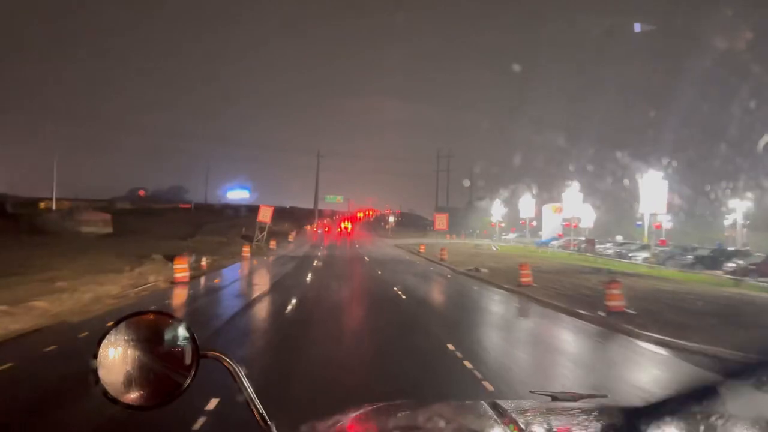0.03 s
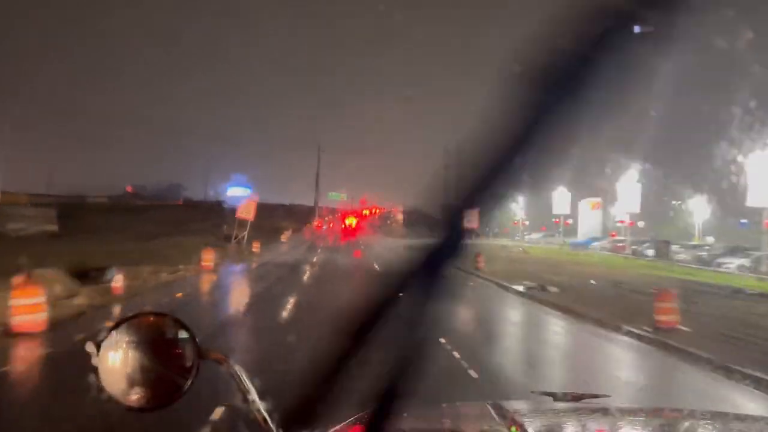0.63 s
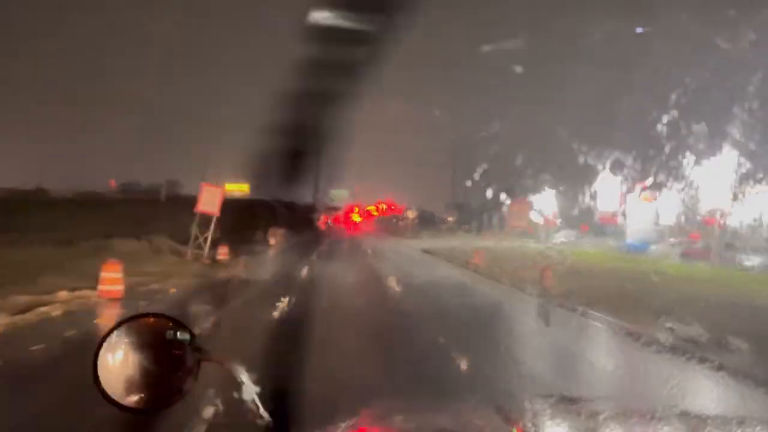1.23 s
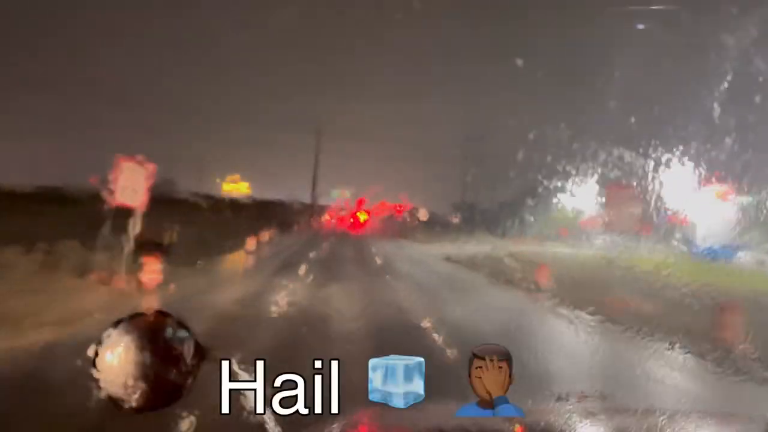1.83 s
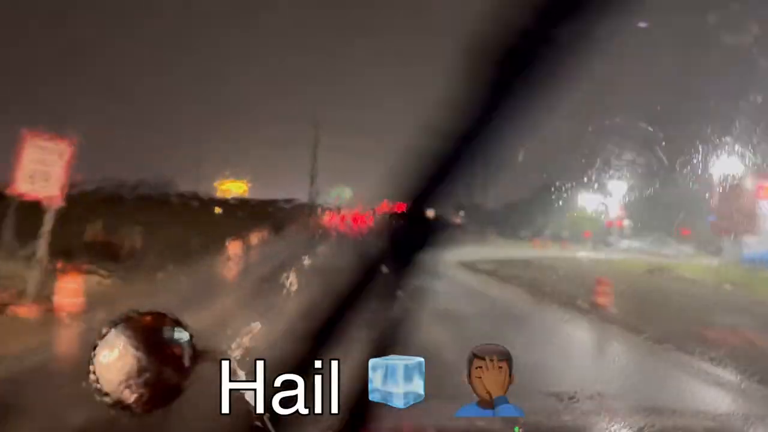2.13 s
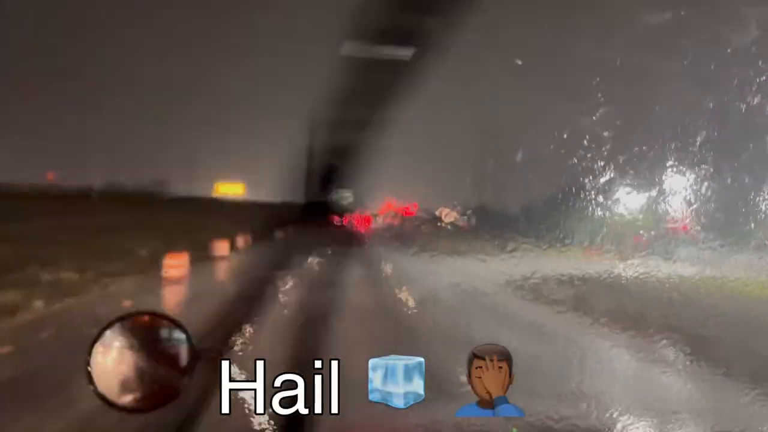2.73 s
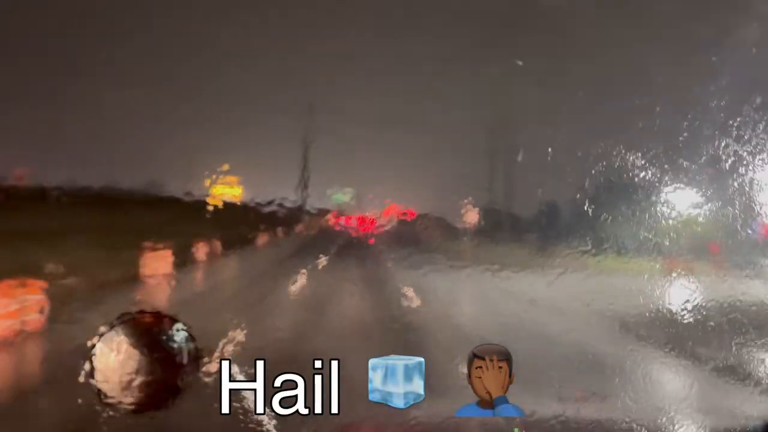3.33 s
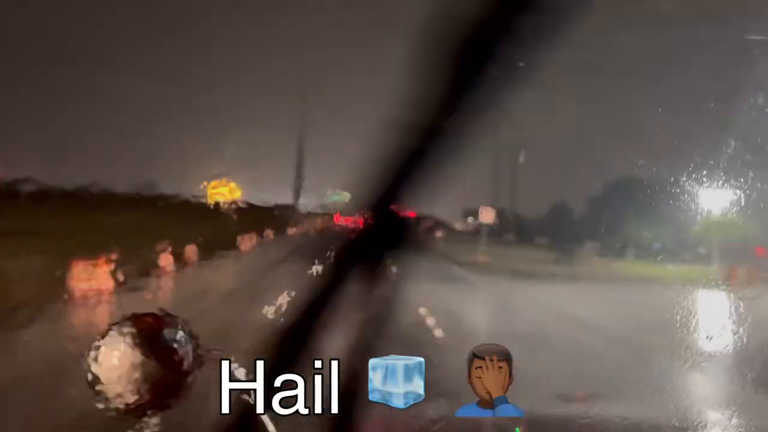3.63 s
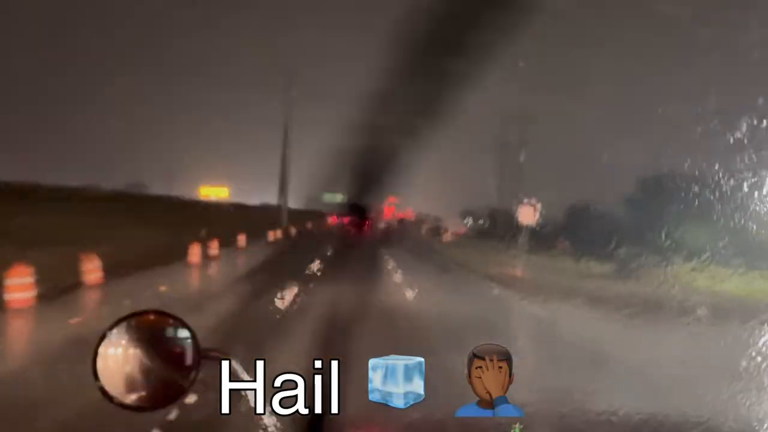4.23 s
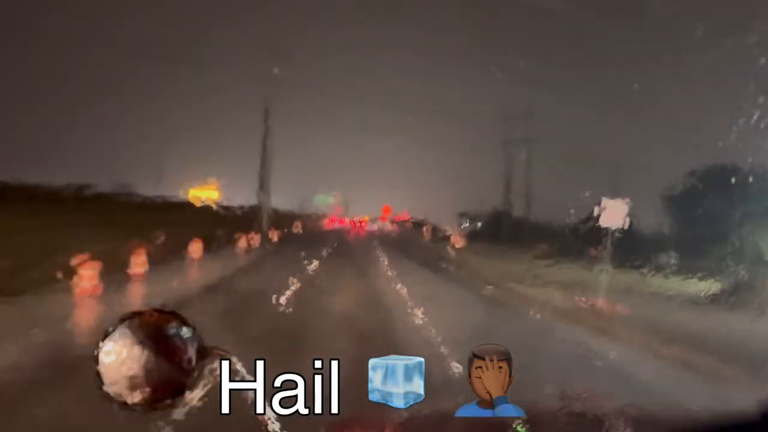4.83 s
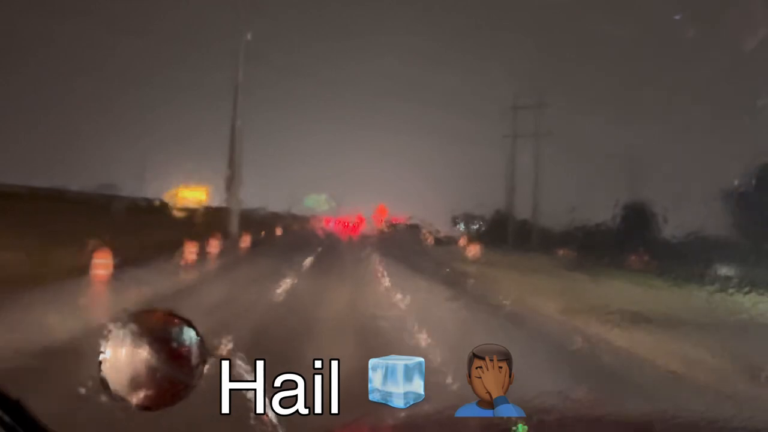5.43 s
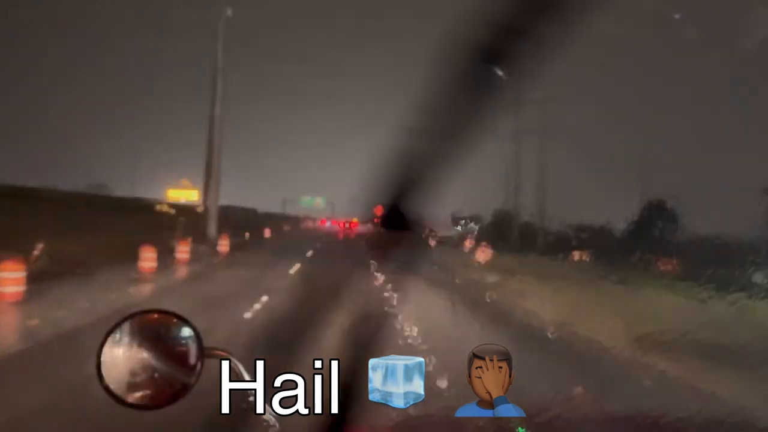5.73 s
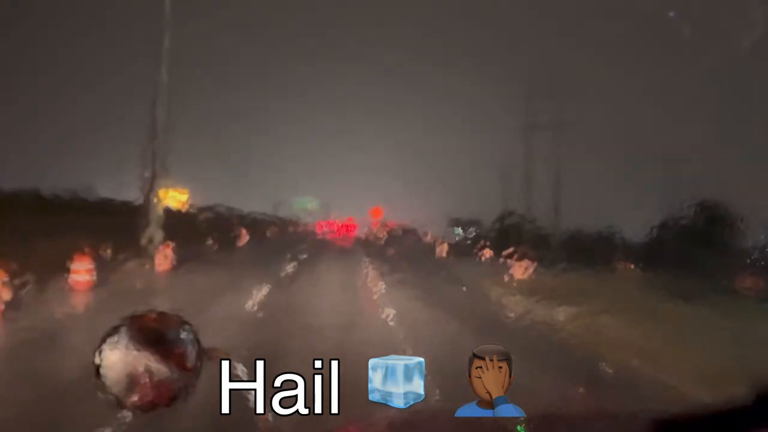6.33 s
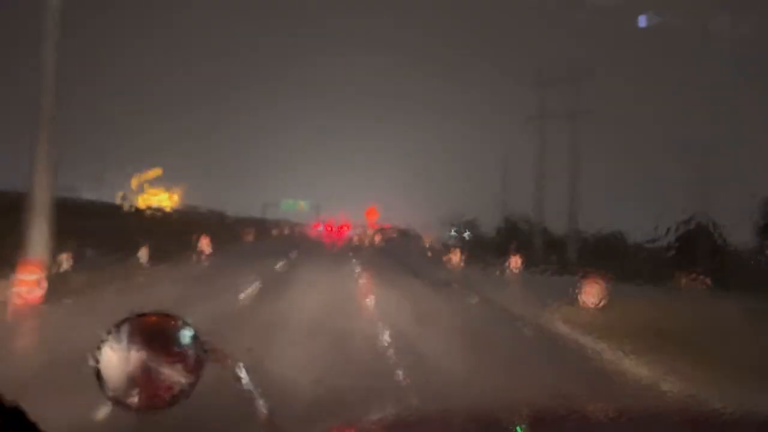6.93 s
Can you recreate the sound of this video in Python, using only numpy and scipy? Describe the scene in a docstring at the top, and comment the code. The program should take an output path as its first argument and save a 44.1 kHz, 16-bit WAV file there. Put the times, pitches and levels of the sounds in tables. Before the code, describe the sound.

Hail and rain suddenly pelt a truck's windshield and roof, heard from inside over tyre rumble and a low diesel hum.

```python
"""Truck cab in a night hailstorm

Tyres rumble on the wet road, a few bumps make the cab boom, and the diesel hums, slows and drops a gear.
The storm sets in abruptly: ice ticks on the windshield, sleet and rain patter on the glass and drum on
the roof, and big stones set body panels ringing. All of it is heard from the driver's seat."""
import sys
import numpy as np
from scipy import signal
from scipy.fft import rfft, irfft, next_fast_len
from scipy.io import wavfile
from scipy.ndimage import uniform_filter1d

SR = 44100
rng = np.random.default_rng(int(sys.argv[2]) if len(sys.argv) > 2 else 0)


def to_wav(s):
    """Save 16-bit WAV."""
    ch = np.atleast_2d(s).T  # columns
    pcm = np.round(np.clip(ch, -1, 1) * 32767)  # PCM
    wavfile.write(sys.argv[1], SR, pcm.astype(np.int16))


N = 316850
TIME = np.arange(N) / SR
TAIL = 4096  # samples in one impact
IMPACT_TIME = np.arange(TAIL) / SR
# tone of the struck windshield: f/Hz, level/dB
GLASS_EQ = [(400, -20), (800, -10.5), (1100, -7.5), (1350, -7), (1650, -3.3), (2000, .8), (2450, 1.6),
            (3000, -.3), (3500, -4.5), (5000, -7.5), (7500, -11.5), (16000, -87)]


def undb(db):
    """Decibels to gain."""
    return 10 ** (np.asarray(db) / 20)


def unit(x):
    """Scale to rms 1."""
    return x / np.sqrt(np.mean(x ** 2))


def pan(right_db):
    """Left and right gains, with the right louder by right_db."""
    return undb(np.array([[-.5], [.5]]) * right_db)


def curve(rows):
    """The columns of a table, joined by straight lines in time."""
    times, *columns = np.transpose(rows)
    return np.squeeze([np.interp(TIME, times, column) for column in columns])


def fade(t, t60):
    """Free decay that loses 60 dB in t60 seconds."""
    return np.exp(-np.log(1000) * t / t60)


def drift(rate_hz):
    """Smooth random wander with rms 1."""
    hold = int(SR / rate_hz)
    steps = np.repeat(rng.standard_normal(N // hold + 1), hold)
    return unit(uniform_filter1d(steps, hold)[:N])


def colour(x, points, size=8192):
    """Minimum-phase EQ through (f/Hz, level/dB) points, so that attacks stay sharp."""
    hz, db = np.transpose(points)
    bin_hz = np.maximum(np.arange(size // 2 + 1) * SR / size, 1)
    gain = undb(np.interp(np.log(bin_hz), np.log(hz), db))
    cepstrum = irfft(np.log(gain))[:size // 2]
    cepstrum[1:] *= 2  # folding onto positive time makes the filter causal
    response = irfft(np.exp(rfft(cepstrum, size)))
    return signal.fftconvolve(x, response[None], axes=1)[:, :N]


def ringing(start_s, hz, db, t60, sag=0, push_s=.0017):
    """A blow builds up over the push and leaves one damped mode, whose pitch may sag (octaves per s)."""
    span = slice(int(start_s * SR), int(start_s * SR) + SR)
    t = TIME[span] - start_s
    turns = np.cumsum(hz * 2. ** (-sag * t)) / SR
    attack = 1 - np.exp(-t / push_s)
    out = np.zeros(N)
    out[span] = undb(db) * attack * fade(t, t60) * np.sin(2 * np.pi * turns)
    return out


def road():
    """Tyre rumble through the floor, a deep shudder of the cab and a steady wash of wind and spray."""
    # tyre rumble spectrum: f/Hz, level/dB
    rumble_eq = [(20, -23), (33, -9), (52, 0), (75, 0), (95, -.7), (118, 1.5), (145, -2.5), (163, -3.5),
                 (195, -8.5), (215, -12), (240, -7), (290, -15), (450, -16.5), (900, -50)]
    # wind and spray spectrum: f/Hz, level/dB
    spray_eq = [(150, -23), (400, -0.5), (700, 1.5), (1100, -6), (2000, -14), (4000, -18), (7500, -42),
                (15000, -31)]
    # road roughness: t/s, rumble/dB, shudder/dB
    roughness = [(0, -17.5, -14.5), (.5, -19.5, -20), (1.1, -19, -20), (2, -20.5, -20), (3.2, -19, -19.3),
                 (4.2, -19, -21), (4.8, -21.3, -22.5), (5.4, -19.5, -19.5), (5.8, -18, -17),
                 (6.3, -18, -16.5), (7.18, -19, -17.5)]
    opposed = np.array([[1], [-1]])
    # long waves reach both sides alike, shorter ones differ
    mid, side = colour(rng.standard_normal((2, N)), rumble_eq)
    side = signal.sosfilt(signal.butter(1, 330, "high", fs=SR, output="sos"), side)
    tyres = unit(mid + .47 * side * opposed)
    shudder = signal.sosfiltfilt(signal.butter(3, 95, fs=SR, output="sos"), tyres)
    rumble_db, shudder_db = curve(roughness)
    mid, side = rng.standard_normal((2, N))
    spray = unit(colour(mid + side * opposed, spray_eq)) * undb(-33.5 + 2.84 * drift(6))
    return (tyres - shudder) * undb(rumble_db) + shudder * undb(shudder_db) + spray


def engine():
    """Partials of the diesel's cycle swell as they glide through the resonances of the cab."""
    # engine speed: t/s, four-stroke cycle rate/Hz
    speed = [(0, 11.05), (1, 11.05), (2.1, 10.88), (3, 10.6), (3.6, 10.32), (4.2, 9.96), (4.9, 9.48),
             (5.25, 9.53), (5.48, 9.4), (5.8, 10.15), (6.12, 11.55), (6.27, 11.6), (6.38, 12.08),
             (7.18, 11.65)]
    # hum under changing load: t/s, level/dB
    load = [(0, -26), (1.1, -25.5), (1.4, -27), (2.4, -27.5), (3, -24), (3.9, -24.5), (4.4, -27.5),
            (4.75, -27.5), (5.2, -27), (5.55, -22.5), (6, -29), (6.22, -24), (6.5, -25), (6.9, -23),
            (7.18, -24.5)]
    # engine partials: multiple of the cycle rate
    orders = np.array([5, 8, 10, 12, 14, 16, 18, 20, 22, 24])
    # balance of those partials: level/dB
    order_db = [-3, -2, -4, -1.5, -4, -2, .5, .5, -1.5, -8]
    # air resonances of the cab: f/Hz, width/Hz, level/dB
    cab_modes = [(55, 18, -3), (120, 45, -4), (206, 29, 1)]
    cycle_hz = curve(speed) * (1 + .0008 * drift(9))
    turns = np.cumsum(cycle_hz) / SR
    hum = 0
    for order, db in zip(orders, order_db):
        resonance = sum(undb(peak_db) / (1 + (2 * (order * cycle_hz - hz) / width) ** 2)
                        for hz, width, peak_db in cab_modes)
        waver_db = .5 * drift(6.5)
        partial = np.sin(2 * np.pi * (order * turns + rng.random()))
        hum += resonance * undb(db + waver_db) * partial
    return np.sqrt(2) * hum * undb(curve(load))


def bumps():
    """Each bump in the road loads the springs and leaves the cab booming."""
    # booms: t/s, f/Hz, level/dB, t60/s, pitch sag/(octaves per s)
    booms = [(.059, 60.6, -8, .31, .5), (.22, 89, -7.5, .33, .5), (1.07, 160, 2.5, .19, 15),
             (5.45, 46, -14, .84, -1), (5.465, 71.5, -2.3, .88, -.2), (5.475, 112, -5, .32, .5),
             (6.16, 116, -1, .3, 0)]
    return sum(ringing(*boom, push_s=.03) for boom in booms)


def impact(contact_t60, cab_t60, cab_db, spread, right_db):
    """A hit on one spot of the cab: a short crack, then reflections that differ left and right."""
    noise = rng.standard_normal(TAIL) + spread * rng.standard_normal((2, TAIL))
    crack = unit(noise * fade(IMPACT_TIME, contact_t60))
    reflections = unit(rng.standard_normal((2, TAIL)) * fade(IMPACT_TIME, cab_t60))
    return (crack + undb(cab_db) * reflections) * pan(right_db + 2 * rng.standard_normal())


def clink(middle_hz=2300):
    """A stone on glass or trim rings very briefly, each at a pitch of its own."""
    hz = middle_hz * 2 ** np.clip(.5 * rng.standard_normal(), -1.5, 1.5)
    phase = 2 * np.pi * rng.random() + rng.standard_normal((2, 1))
    return np.sin(2 * np.pi * hz * IMPACT_TIME + phase) * fade(IMPACT_TIME, t60=.02) * pan(right_db=2)


def shower(per_s, density, scatter_db, biggest_db, hit, spots=40):
    """Random hits on many spots, most small, a few large. At a low density each stands out more."""
    chance = rng.random(N)
    size = rng.standard_exponential(N)
    spot = rng.integers(spots, size=N)
    force = undb(np.minimum(scatter_db * size, biggest_db)) / np.sqrt(density)
    sounds = [hit() for _ in range(spots)]
    out = np.zeros((2, N + TAIL))
    for i in np.flatnonzero(chance < per_s * density / SR):
        out[:, i:i + TAIL] += force[i] * sounds[spot[i]]
    return out[:, :N]


def precipitation(storm_db):
    """Roof drumming, patter and clinks on the glass, ticks of ice and fine drops follow the storm."""
    # drumming roof spectrum: f/Hz, level/dB
    roof_eq = [(150, -16), (270, -1.5), (430, -1.5), (510, 1), (610, 3.5), (820, -7), (1100, -3),
               (1600, -7.5), (4000, -40.5)]
    # ticking ice spectrum: f/Hz, level/dB
    ice_eq = [(800, -18), (2000, -8), (3200, -4.5), (4400, -1.5), (5700, -1), (7300, 1.5), (8800, -2),
              (10200, -2.5), (12000, -7), (16000, -8.5)]
    # sizzle of fine drops: f/Hz, level/dB
    sizzle_eq = [(3000, -20), (7000, -2), (9500, 0), (12500, -4), (16000, -2)]
    thinning = .28  # share of a lull that comes from fewer stones rather than softer ones
    density = undb(thinning * storm_db) ** 2
    flurry = drift(30)  # the stones arrive in clumps
    ice_db = storm_db + 1.35 * flurry
    # the lined roof rings longest and is heard from all round
    roof = shower(per_s=1000, density=density, scatter_db=5, biggest_db=12.5,
                  hit=lambda: impact(.043, .086, cab_db=-1.5, spread=1.64, right_db=0))
    # the windshield lies ahead and to the right
    patter = shower(per_s=1800, density=density, scatter_db=3.6, biggest_db=11,
                    hit=lambda: impact(.012, .055, cab_db=-3, spread=.45, right_db=2.6))
    ice = shower(per_s=850, density=density, scatter_db=4.2, biggest_db=12.5,
                 hit=lambda: impact(.005, .045, cab_db=-4.5, spread=.25, right_db=2.4))
    drops = shower(per_s=600, density=density, scatter_db=4.5, biggest_db=13,
                   hit=lambda: impact(.005, .04, cab_db=-5, spread=.4, right_db=-1))
    clinks = shower(per_s=380, density=density, scatter_db=3, biggest_db=6, hit=clink, spots=300)
    return (unit(colour(roof, roof_eq)) * undb(-26 + .94 * storm_db)
            + unit(colour(patter, GLASS_EQ)) * undb(-26 + storm_db + .5 * flurry)
            + unit(clinks) * undb(-31.5 + storm_db)
            + unit(colour(ice, ice_eq)) * undb(-31.5 + ice_db)
            + unit(colour(drops, sizzle_eq)) * undb(-39.5 + ice_db))


def add_hit(track, start_s, hit, peak_db):
    """Lay one hit into a stereo track at a given peak level."""
    start = int(start_s * SR)
    track[:, start:start + TAIL] += undb(peak_db) * hit / np.abs(hit).max()


def stray_stones(storm_db, per_s=3):
    """Middling stones at random moments, as hard as the storm is strong: t/s, tick/dB, knock/dB."""
    moments = np.flatnonzero(rng.random(N) < per_s / SR)
    tick_db, knock_db = storm_db + rng.standard_normal((2, N))
    return [(TIME[i], tick_db[i] - 11, knock_db[i] - 8) for i in moments]


def windshield_stones(storm_db):
    """Single stones on the windshield: the ice cracks brightly and the glass gives a duller knock."""
    # the hardest stones: t/s, tick/dB, knock/dB
    hard_stones = [(.394, -26, -13), (.5105, -17, -9), (.526, -11, -20), (.6138, -3, -21),
                   (.6245, -19, -11), (.630, -14, -15), (.6485, -10, -23), (.6856, -5, -16),
                   (.6952, -8.5, -18), (.7462, -2.5, -9), (.7697, -9, -6), (.7826, -7, -14),
                   (.7916, -7, -11), (.813, -9, -3), (.8836, -7, -8), (.915, -8, -9), (.928, -6, -12),
                   (.995, -4, -11), (1.006, -6, -3), (1.134, -1.5, -13), (1.19, -10, -6), (1.2078, 4, 2),
                   (1.2108, -7, -5), (1.2174, -4, -4), (1.241, -4, -6), (1.297, -6, -12), (1.389, -4, -10),
                   (1.4235, -3.5, -14), (1.5212, -1, -1), (1.623, -5, -6), (1.7565, -6, -6),
                   (1.785, -8, -5), (1.8264, -6, -6), (1.9305, -2, -10), (1.942, -3, -14), (2.007, -12, -4),
                   (2.1146, -5, -4), (2.1665, -3, -14), (2.2557, -5, -2), (2.433, -3, -11), (3.246, -5, -6),
                   (3.478, -12, -2), (3.784, -5, -10), (3.959, -5, -1.5), (4.1435, -3.5, -11),
                   (4.261, -3.5, -12), (4.3053, -3.5, -6), (4.66, -3.5, -9), (4.7837, -5, -10),
                   (4.983, -7, -7), (5.3835, -6, -12), (6.455, -2.5, -5), (7.1698, -6.5, -4)]
    # cracking ice spectrum: f/Hz, level/dB
    crack_eq = [(800, -21), (2000, -11), (3200, -7), (4400, -1.5), (5700, -2), (7300, -.5), (8800, -7.5),
                (10500, -7), (16000, -14)]
    ticks, knocks = np.zeros((2, 2, N + TAIL))
    for start_s, tick_db, knock_db in hard_stones + stray_stones(storm_db):
        tick = impact(contact_t60=.006, cab_t60=.04, cab_db=-12, spread=.35, right_db=2.5)
        knock = impact(contact_t60=.042, cab_t60=.099, cab_db=.5, spread=.41, right_db=8)
        add_hit(ticks, start_s, tick, tick_db)
        add_hit(knocks, start_s, knock, knock_db)
    return colour(ticks[:, :N], crack_eq) + colour(knocks[:, :N], GLASS_EQ)


def panel_stones():
    """A big stone gives a dry clack on a body panel, which then rings briefly."""
    # ringing panels: t/s, f/Hz, level/dB, t60/s
    clonks = [(.636, 462, -22.5, 0.2), (.888, 459, -17.5, 0.2), (.894, 1030, -20, .052),
              (1.341, 1170, -19, 0.044), (1.89, 1040, -15.5, .035), (2.392, 495, -20, 0.066),
              (2.683, 1140, -26, .035), (3.121, 463, -18, 0.19), (3.696, 1080, -20, 0.032),
              (4.57, 586, -22, 0.085), (5.281, 902, -29, 0.044), (5.691, 490, -20, 0.092),
              (6.4, 1080, -17.5, .03), (6.554, 930, -29, .04), (6.862, 1035, -18, .045)]
    # dry clack spectrum: f/Hz, level/dB
    panel_eq = [(250, -5), (600, 0), (1100, 3), (1900, -5.5), (4500, -23)]
    clacks = np.zeros((2, N + TAIL))
    for start_s, _, ring_db, _ in clonks:
        clack = impact(contact_t60=.027, cab_t60=.1, cab_db=2, spread=1, right_db=-4.5)
        add_hit(clacks, start_s, clack, ring_db + 18.5)
    return colour(clacks[:, :N], panel_eq) + sum(ringing(*clonk) for clonk in clonks)


def scene():
    """The low bed of the truck with the hailstorm on top."""
    # storm strength, setting in abruptly and coming in flurries: t/s, level/dB
    storm = [(0, -42.5), (.59, -41.5), (.625, -40.5), (.74, -37), (.77, -30), (.89, -28.7), (.96, -31.5),
             (1.02, -28.5), (1.16, -28.5), (1.21, -28), (1.28, -27), (1.45, -27.5), (1.85, -28),
             (2.1, -24.5), (2.22, -27), (2.48, -23.5), (2.62, -27.5), (2.68, -24), (2.8, -26.5),
             (2.89, -24.5), (2.97, -27.5), (3.09, -25), (3.4, -26.5), (3.47, -25), (3.68, -26), (3.88, -28),
             (3.96, -26), (4.14, -26), (4.2, -28), (4.28, -26), (4.45, -27), (4.65, -27.5), (4.86, -31),
             (5.02, -26.5), (5.1, -29), (5.2, -27.5), (5.62, -29), (5.8, -25.2), (6.15, -27), (6.55, -26.7),
             (6.76, -29.5), (6.82, -26), (6.98, -27.3), (7.18, -30.5)]
    storm_db = curve(storm) + 25.5  # 0 dB is the full downpour
    truck = road() + engine() + bumps()
    return truck + precipitation(storm_db) + panel_stones() + windshield_stones(storm_db)


def record(dry):
    """A stereo pickup shifts the phase between the sides and cuts the top."""
    # phase between the sides, opposed in two treble bands: f/Hz, lead of the right/rad
    right_lead = [(0, 0), (2100, 0), (3200, 1), (4400, .35), (5900, .9), (7500, 0), (8200, 3.1),
                  (9500, 3.1), (10600, 0), (11700, 0), (12600, -3.1), (14000, -3.3), (14900, -6.28)]
    hz, lead = np.transpose(right_lead)
    size = next_fast_len(N + TAIL)
    bin_hz = np.arange(size // 2 + 1) * SR / size
    shift = np.exp(1j * np.interp(bin_hz, hz, lead))
    right = irfft(rfft(dry[1], size) * shift, size)[:N]
    high_cut = signal.ellip(10, .2, 80, 15750, fs=SR, output="sos")
    return signal.sosfilt(high_cut, [dry[0], right])


dry = scene()
out = record(dry)
to_wav(out)
```